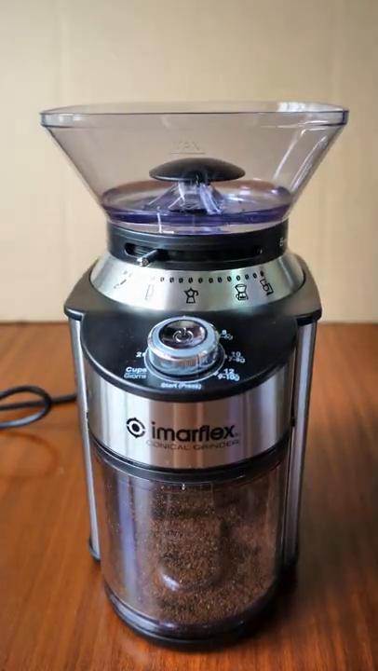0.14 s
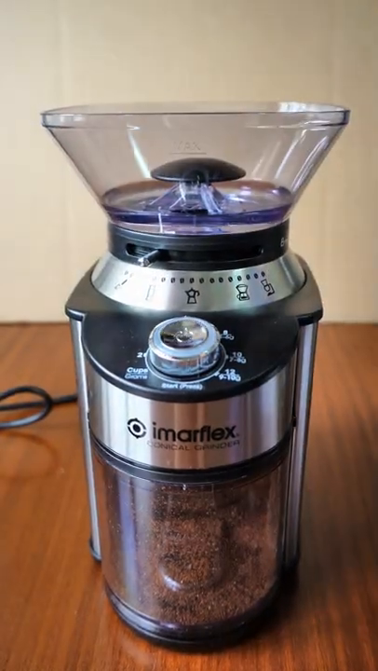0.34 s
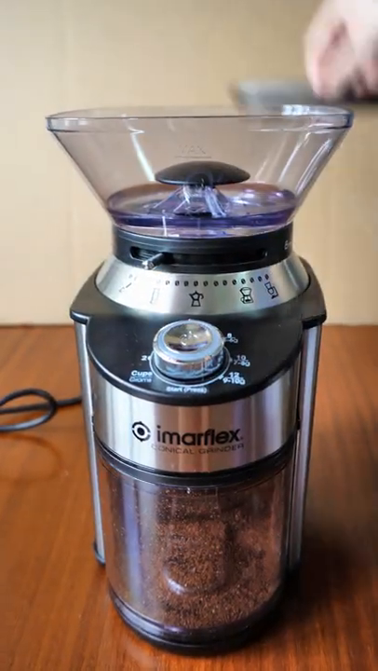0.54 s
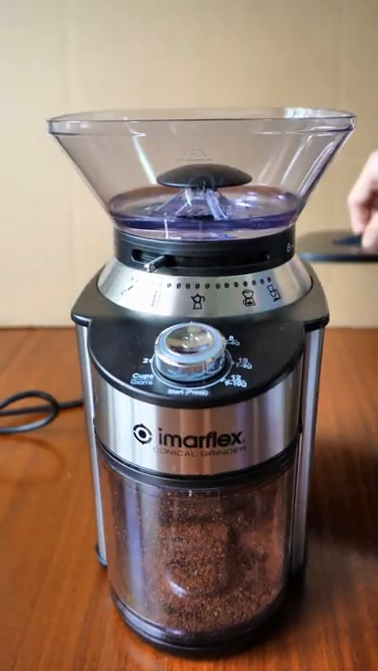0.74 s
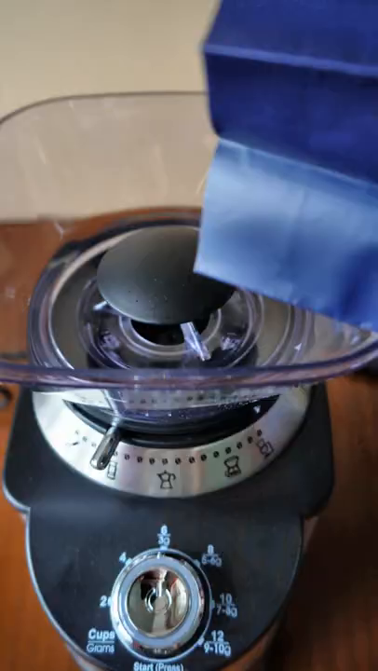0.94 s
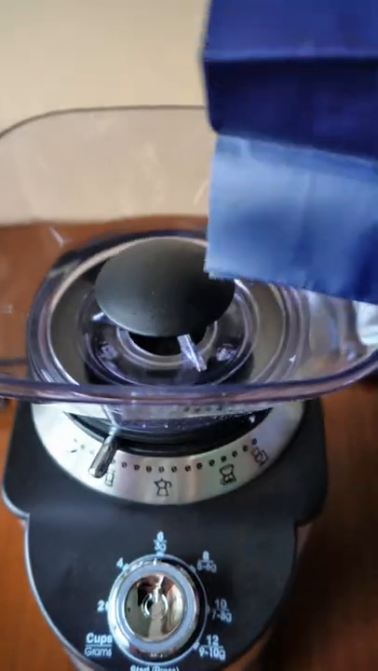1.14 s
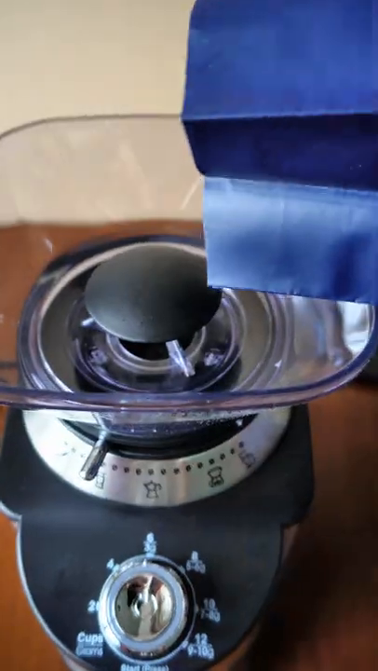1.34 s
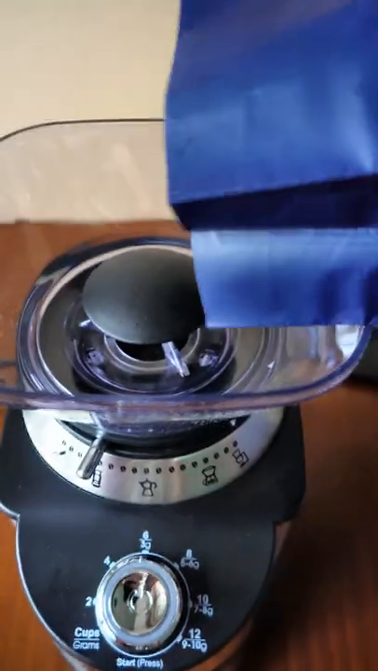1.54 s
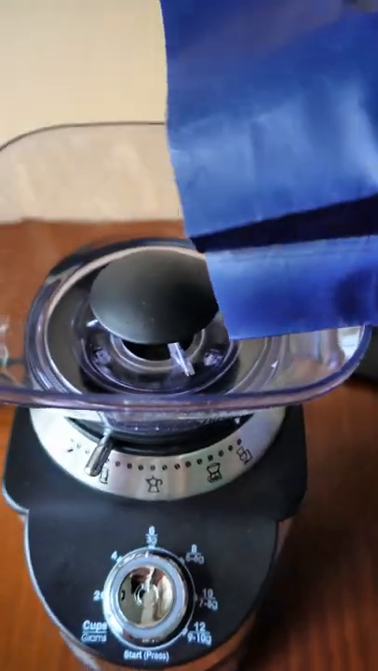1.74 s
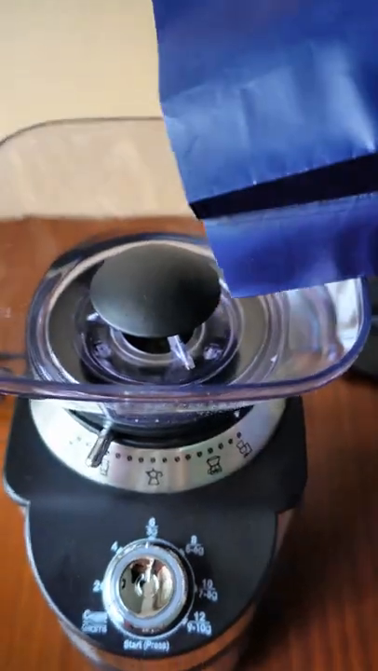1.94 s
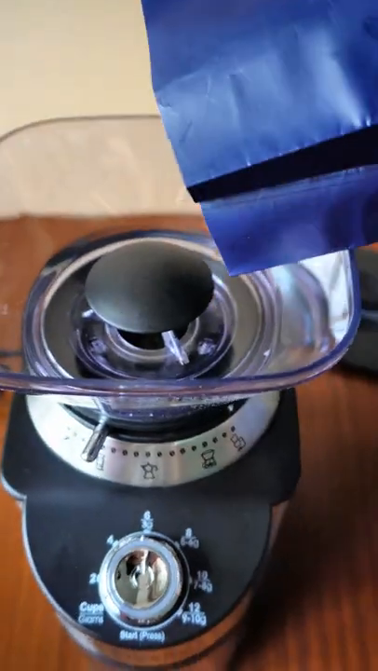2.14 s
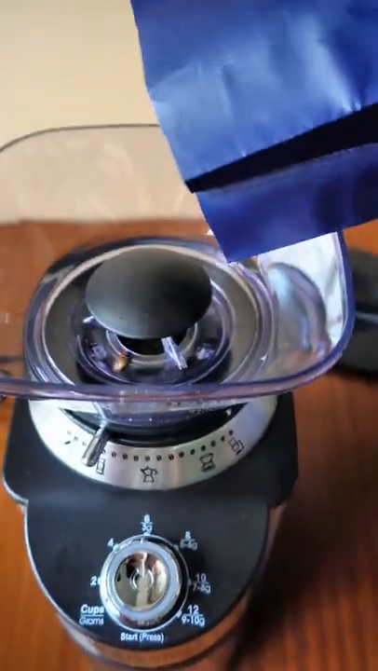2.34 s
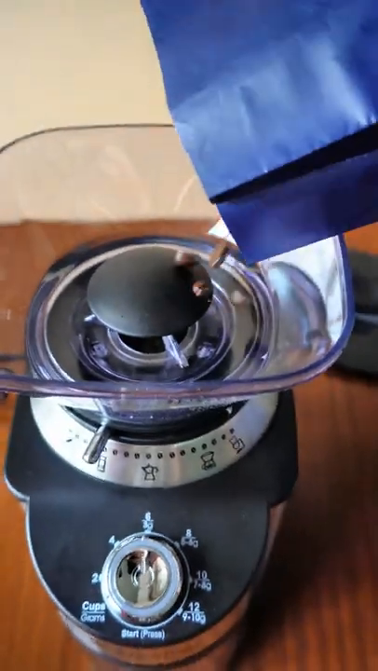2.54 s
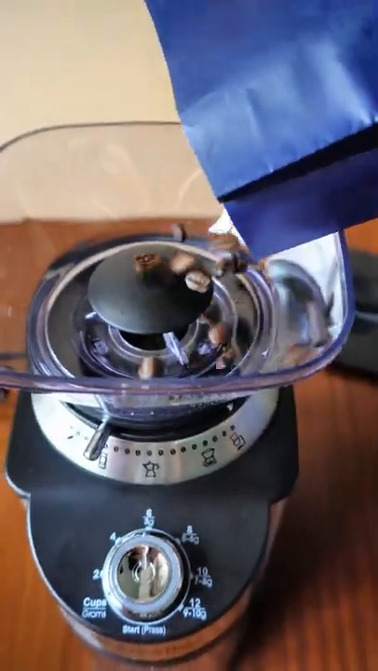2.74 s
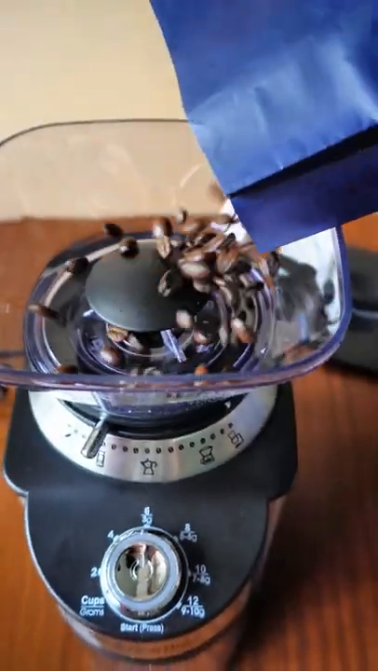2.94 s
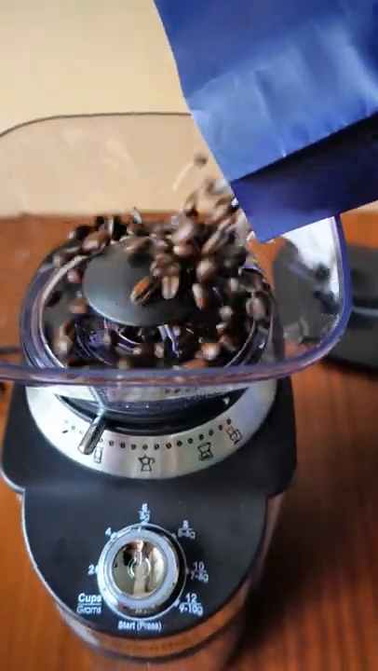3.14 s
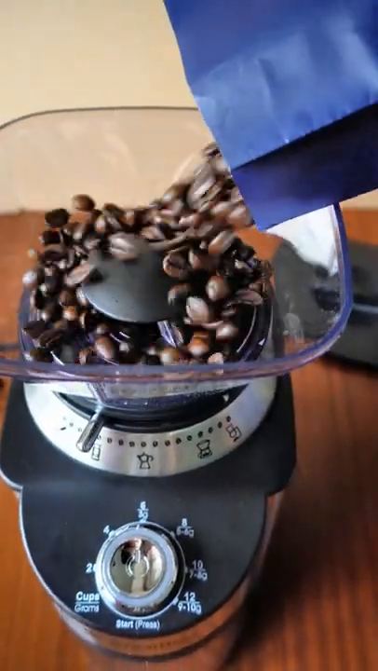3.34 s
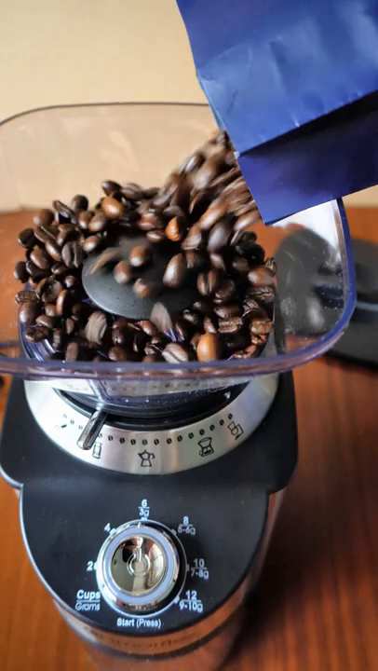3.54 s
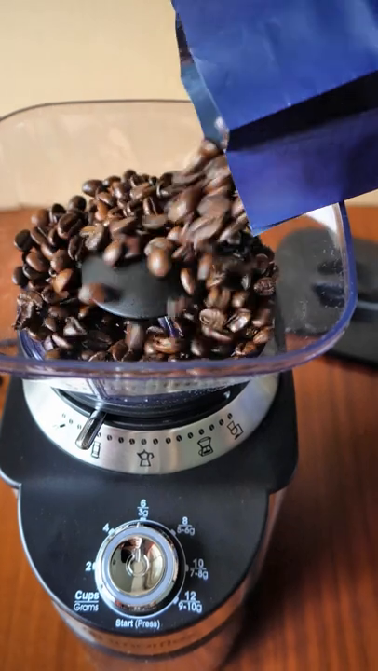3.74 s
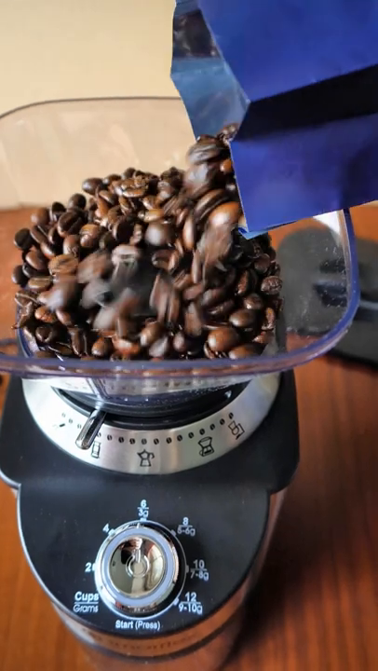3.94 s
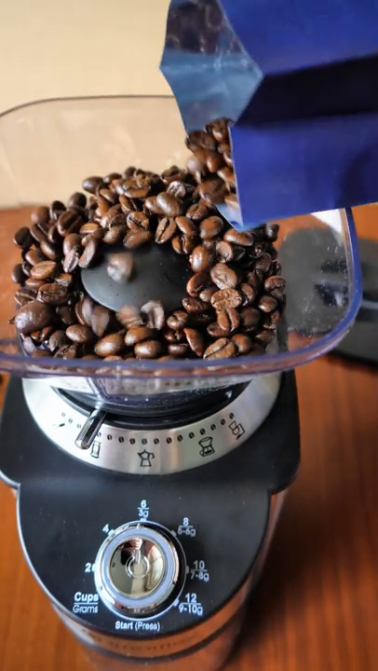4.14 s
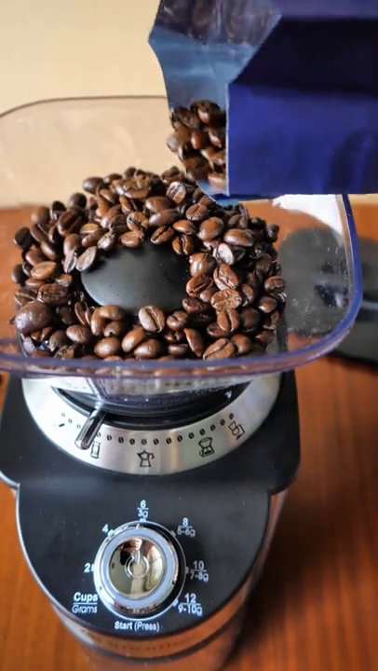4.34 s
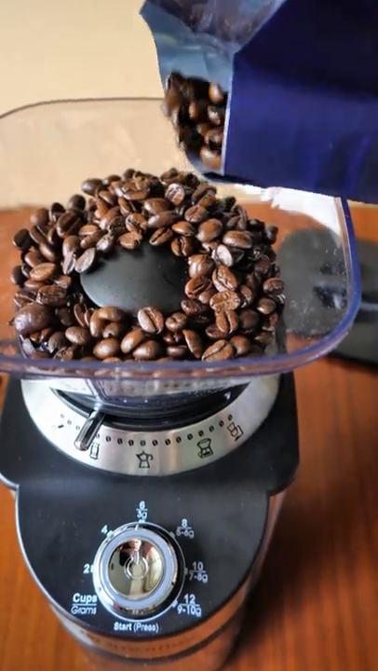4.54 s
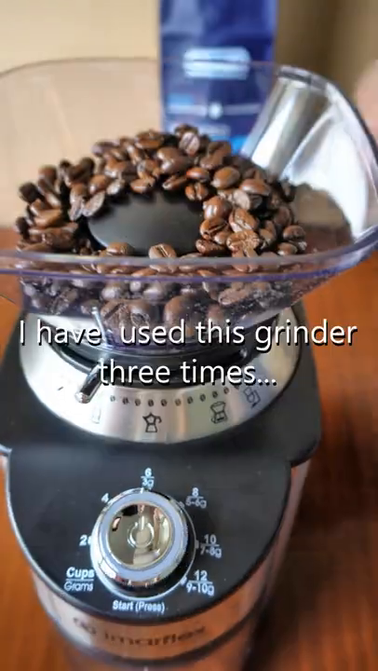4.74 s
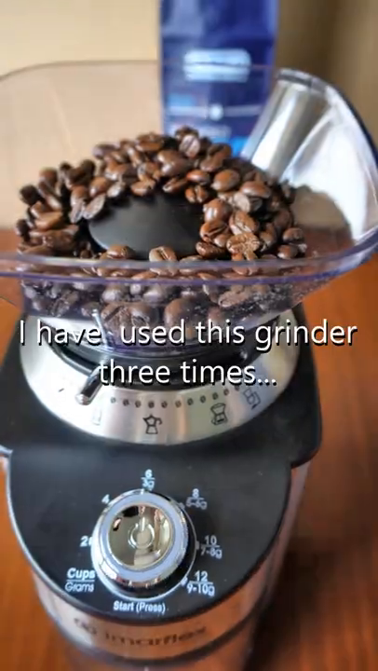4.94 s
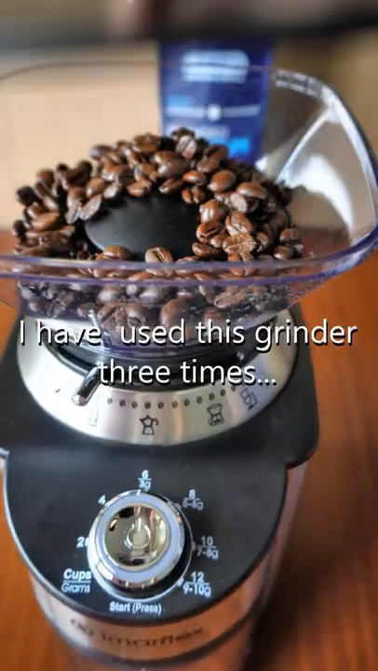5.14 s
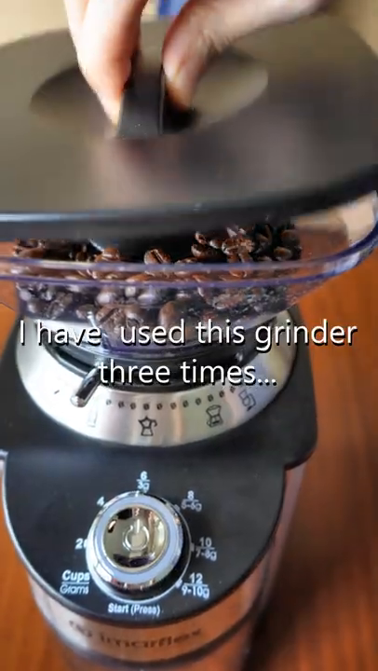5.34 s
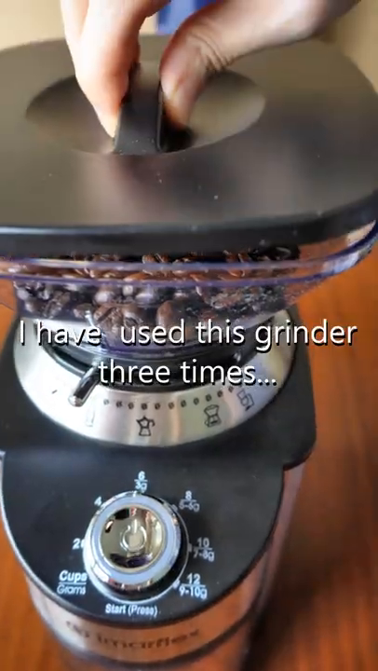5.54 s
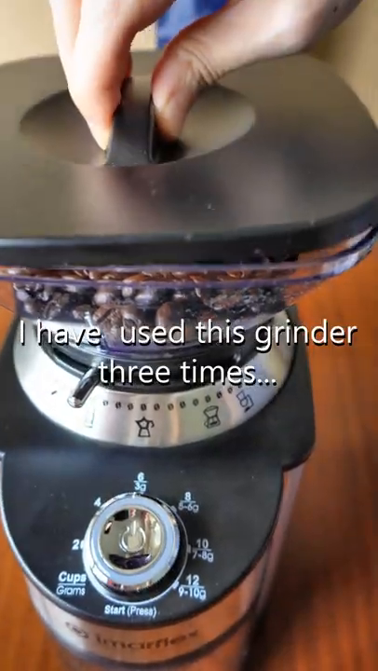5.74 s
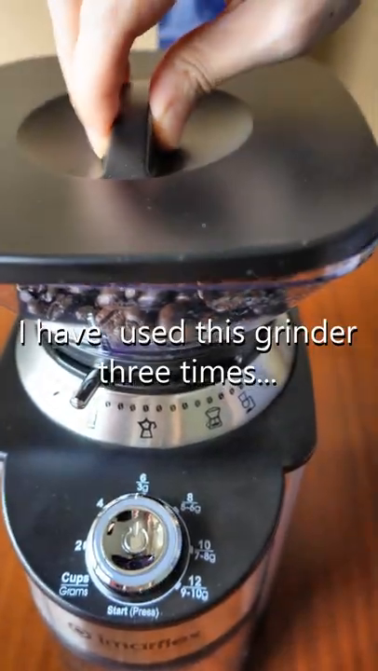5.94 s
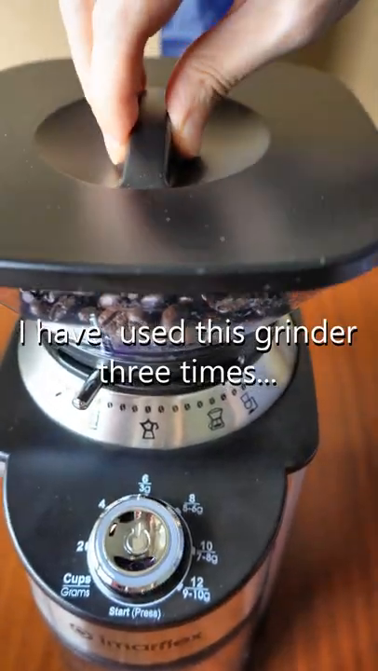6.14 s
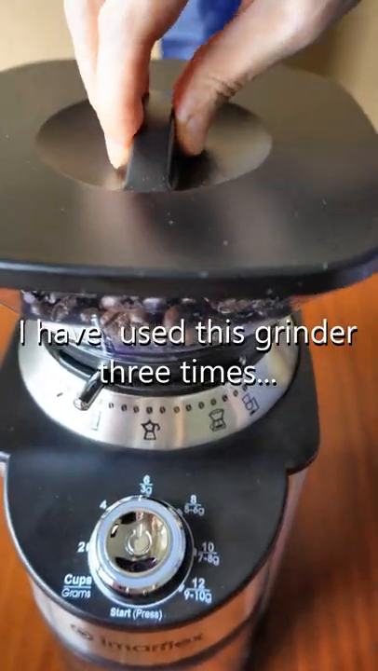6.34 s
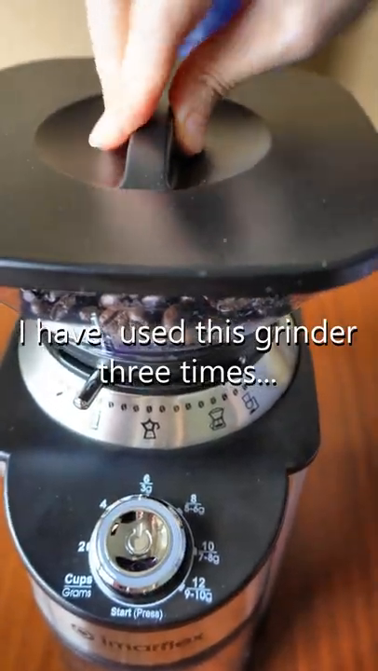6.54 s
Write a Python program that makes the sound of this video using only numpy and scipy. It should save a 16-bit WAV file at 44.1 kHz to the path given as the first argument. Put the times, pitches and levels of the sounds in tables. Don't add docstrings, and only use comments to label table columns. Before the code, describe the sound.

Two close microphones, nearly centred and slightly wider in the treble, catch soft skin rubs and plastic ticks, then sharp foil snaps with beans shifting inside. Hard bean clicks multiply into a loud hopper rattle, dwindling to stragglers and a few foil snaps. After an abrupt cut come hollow lid knocks and short plastic rubs over faint hiss and low hum.

```python
import sys
import numpy as np
from scipy import signal
from scipy.fft import rfft, irfft, next_fast_len
from scipy.io import wavfile
from scipy.ndimage import uniform_filter1d, minimum_filter1d, map_coordinates

SR = 44100
rng = np.random.default_rng(int(sys.argv[2]) if len(sys.argv) > 2 else 0)


def generate_wav(sig):
    pcm = np.round(np.clip(np.atleast_2d(sig).T, -1, 1) * 32767).astype(np.int16)
    wavfile.write(sys.argv[1], SR, pcm)


def boost_factor(decibels):
    exponent = np.asarray(decibels, float) / 20
    return 10 ** exponent


N = 294588
TIME = np.arange(N) / SR


def unit(x):
    return x / np.sqrt(np.mean(x ** 2) + 1e-20)


def along(points, hz):
    f, v = np.transpose(points)
    return np.interp(np.log(hz + 1), np.log(f + 1), v)


def curves(*tables):
    out = np.full((len(tables[0][0]) - 1, N), -120.)
    for rows in tables:
        s, *cols = np.transpose(rows)
        inside = (TIME >= s[0]) & (TIME <= s[-1])
        out[:, inside] = [np.interp(TIME[inside], s, c) for c in cols]
    return out


def filtered(x, response):
    m = next_fast_len(x.shape[-1] + 4096)
    spectrum = rfft(x, m) * response(np.fft.rfftfreq(m, 1 / SR))
    return irfft(spectrum, m)[..., :x.shape[-1]]


def body(modes, scatter_db):
    c, w, db = np.reshape(modes, (-1, 3, 1)).transpose(1, 0, 2)
    gain = boost_factor(db + scatter_db * rng.standard_normal(c.shape)) * rng.choice([-1, 1], c.shape)
    c = c + 0.12 * w * rng.standard_normal(c.shape)
    return lambda f: 1 + np.sum(gain * 1j * f * w / (c * c - f * f + 1j * f * w), axis=0)


def burst(t60, crack_db, size):
    t = np.arange(size) / SR
    decay = boost_factor(-60 * t / t60) + boost_factor(crack_db - 60 * t / 0.0059)
    z = rfft(rng.standard_normal((2, size)) * decay)
    even = z / np.sqrt(uniform_filter1d(np.abs(z) ** 2, size=size // 70) + 1e-9)
    return irfft(even) * (t < .75 * t[-1])


def drift():
    drift_db, drifts_per_s = 4, 5
    knots = rng.standard_normal(int(N * drifts_per_s / SR) + 4)
    return boost_factor(drift_db * map_coordinates(knots, [TIME * drifts_per_s]))


def grains(rate, spread_db, t60, spectrum, modes=[], count=3, own=list):
    out = 0
    for _ in range(count):
        draw = rng.random((2, N))
        size_db = np.minimum(-spread_db * np.log(draw[1] + 1e-9), 4 * spread_db)
        sizes = (draw[0] < rate / SR / count) * boost_factor(size_db)
        angles = np.array([np.ones(N), rng.standard_normal(N)])
        pair = drift() * sizes * angles
        tap = filtered(burst(t60, crack_db=0.0, size=4200)[:1], body(modes + own(), scatter_db=2.0))
        out = out + signal.oaconvolve(pair, tap, axes=1)[:, :N]
    out = filtered(out, lambda hz: boost_factor(along(spectrum, hz)))
    power = uniform_filter1d(out[0] ** 2, SR // 3)
    return out / np.sqrt(np.abs(power) + 1e-12)


def contacts(events, t60, modes, ring_db, scatter_db, low_hz, top_hz, crack_db, favour_db, broad_db):
    favour_octaves = 0.23
    out = np.zeros((2, N + SR))
    edges = [(low_hz, 1200), (1200, 3500), (3500, 7000), (7000, top_hz)]
    bands = [signal.butter(2, e, "bandpass", fs=SR, output="sos") for e in edges]
    for s, db, thud_db, edge_db, sparkle_db, hz in events:
        blow = burst(np.clip(t60, .003, .06), crack_db, size=6000)
        struck = []
        for c, w, g in modes:
            nearness = np.exp(-(np.log2(c / hz) / favour_octaves) ** 2)
            struck.append((c, w, g + ring_db + favour_db * nearness))
        ring = filtered(blow, body(struck + [(hz, 0.34 * hz, broad_db)], scatter_db))
        for sos, level_db, sign in zip(bands, (thud_db, 0, edge_db, sparkle_db), (1, -1, 1, -1)):
            part = sign * signal.sosfilt(sos, ring)
            peak = np.sqrt(uniform_filter1d(part[0] ** 2, size=150).max())
            out[:, round(s * SR):][:, :part.shape[1]] += boost_factor(db + level_db - 7.5) * part / peak
    return out[:, :N]


def touched(events, sparkle_db, per_hardness):
    return [(s, db, thud, edge, sparkle_db + per_hardness * edge, hz) for s, db, thud, edge, hz in events]


def strokes(rows):
    lines = [[(s, db), (s + length, db + swell_db)] for s, length, db, swell_db in rows]
    return uniform_filter1d(boost_factor(curves(*lines)[0]), size=260)


# frequency in Hz, level in dB per Hz.
AIR_COLOUR = [(15, -72.5), (25, -43.5), (53, -35.5), (73, -20), (106, -13), (167, -15.5), (207, -10),
              (383, -17), (1120, -9.5), (2850, -12), (3350, -16.5), (3630, -16.5), (15000, -33.5)]
# time in seconds, level in dB.
HUM_SWELLS = [
    (0, -68),
    (.724, -65.5),
    (4.652, -75),
    (5.75, -70.5),
    (6.55, -60),
]


def air():
    hiss = unit(filtered(rng.standard_normal((2, N)), lambda hz: boost_factor(along(AIR_COLOUR, hz))))
    low = unit(filtered(rng.standard_normal((2, N)), lambda f: 40 * f / np.abs(235 ** 2 - f * f + 40j * f)))
    swell_db_per_s = 21
    hum_db = np.max([db - swell_db_per_s * np.abs(TIME - s) for s, db in HUM_SWELLS], axis=0)
    return boost_factor(-61.5) * hiss + boost_factor(hum_db + 2.0) * low


# start in seconds, length in seconds, level in dB, swell in dB.
HAND_STROKES = [
    (0, 0.58, -64, 9.1),
    (.45, .55, -60.5, 3.2),
]
# frequency in Hz, level in dB per Hz.
SKIN_COLOUR = [(180, -47), (300, -9), (438, -10), (1180, -7), (1500, -4), (1620, -3.5), (4180, -14.5),
               (13000, -26)]
# time in seconds, peak in dB, thud over knock in dB (weight),
# edge over knock in dB (hardness).
LIFT_TICKS = [(0.2576, -37, -24, -7), (0.2952, -49, -9, -2), (0.328, -45, -14, -6),
              (0.4315, -27.5, -23, -6.5), (0.4742, -44.5, -5, 8), (0.635, -49, -13, -1), (0.699, -54, 1, 4),
              (0.7365, -23.5, -2, -10.5), (0.7487, -43, -2, -4), (0.795, -33.5, -21, -11),
              (0.834, -36.5, -11, -8), (0.87, -40, -22, -13), (0.891, -33, -25, -13), (0.956, -51, -8, 7)]
# frequency in Hz, width in Hz, level in dB.
FOIL_MODES = [(895, 230, 1.9), (1200, 5000, 0.62), (2620, 130, 2.5), (4200, 760, 5.4), (5580, 1153, 1.5)]
# as the ticks, then pitch in Hz.
RIM_KNOCKS = [(5.3975, -14.5, -8, -4.5, 910), (5.4015, -24, -8, 6.5, 4040), (5.4322, -17, -7, -6.5, 2700),
              (5.4500, -25, -4, -4.5, 2700), (5.7215, -27, -7.5, 3.5, 893), (5.7255, -20.5, -3, -2, 5760),
              (5.7785, -14, -14, -11.5, 1610), (5.7952, -29, -16, -23, 1500),
              (5.8888, -39.5, 8.5, -0.5, 890), (5.9974, -44.5, 6.5, -24, 923), (6.0826, -28, 0, -2.5, 910),
              (6.0882, -27, 1, -5.5, 900), (6.095, -28.5, -3, 2, 890), (6.103, -18, 0, -11.5, 970),
              (6.2475, -34.5, 11.5, -4, 820), (6.2535, -17, -10, -16.5, 1680),
              (6.3215, -43, -14, -16, 1600), (6.6443, -43, 0, 2, 1720)]
# frequency in Hz, width in Hz, level in dB.
LID_MODES = [(305, 32, 38), (885, 93, 13.8), (1450, 92, 9), (1610, 74, 13.7), (2410, 170, 12.3),
             (2780, 100, 9.7), (3110, 280, 6.9), (4020, 220, 9.5), (4820, 170, 8.5), (5850, 330, 8.9),
             (6970, 100, 2.5)]
# start in seconds, length in seconds, level in dB, swell in dB.
RIM_RUBS = [
    (5.8, 0.084, -49, 5),
    (5.9, 0.094, -59.5, 0),
    (5.995, 0.079, -55, 7),
    (6.066, 0.049, -47, 17.5),
    (6.27, 0.095, -50.5, 4),
    (6.36, 0.21, -54, -10.5),
    (6.55, 0.11, -62, 8.5),
]
# frequency in Hz, level in dB per Hz.
RUB_COLOUR = [(88, -55), (150, -16), (289, -11), (620, -6), (900, -6), (1200, -20.5), (1510, -8),
              (4120, -22.5), (15000, -35.5)]


def lid():
    hand = boost_factor(-2.0) * strokes(HAND_STROKES) * grains(2300, 3.2, 0.0155, SKIN_COLOUR)
    rub = boost_factor(0.2) * strokes(RIM_RUBS) * grains(1700, 1.3, 0.047, RUB_COLOUR)
    lifted = touched([(*row, 2700) for row in LIFT_TICKS], sparkle_db=-9, per_hardness=0.74)
    ticks = contacts(lifted, 0.015, FOIL_MODES, ring_db=-5.0, scatter_db=5.0, low_hz=330, top_hz=12900,
                     crack_db=-9.0, favour_db=-1.0, broad_db=7.5)
    seated = touched(RIM_KNOCKS, sparkle_db=-18, per_hardness=0.35)
    knocks = contacts(seated, 0.03, LID_MODES, ring_db=1, scatter_db=2.0, low_hz=710, top_hz=13800,
                      crack_db=-10.5, favour_db=5.0, broad_db=-12)
    return hand + rub + ticks + knocks


CUTS = [
    0,
    1.0075,
    4.647,
    6.68,
]
# time in seconds, level in dB.
TIPPING = [(1.008, -35), (1.056, -37.5), (1.188, -41.5), (1.54, -37.5), (1.86, -29), (2.066, -34),
           (2.302, -42), (2.4, -34.5), (2.6, -35)]
# time in seconds, level in dB.
SETTLING = [(4.2, -48), (4.26, -45), (4.314, -47), (4.454, -51), (4.608, -44), (4.642, -42)]
# time in seconds, peak in dB, thud over knock in dB,
# edge over knock in dB, pitch in Hz.
TIPPING_SNAPS = [(1.0071, -29.5, -12, 4, 1500), (1.05, -17, -28, -17, 3080), (1.106, -26, -10, -1, 3960),
                 (1.1311, -11.5, -16, -8, 2320), (1.1484, -5.5, -18, -13, 2450),
                 (1.2063, -13.5, -17, -11.5, 2390), (1.244, -16, -17, -11, 4000),
                 (1.2506, -27.5, 3.5, -12, 1500), (1.279, -7, -8, -11, 2430), (1.3164, -46, -16, -6, 2130),
                 (1.378, -35.5, -23, -8, 1450), (1.4314, -23, -12, -8, 1440), (1.477, -24.5, -15, -2, 2300),
                 (1.5004, -22, -2.5, -6, 3960), (1.5064, -23, -10, -7, 1650), (1.5234, -31, -3, -12, 1410),
                 (1.6051, -10, -20, -7, 1440), (1.6768, -23.5, -3, -5, 1370), (1.7216, -10.5, -1, 5, 1140),
                 (1.7574, -29, 0, -21, 1880), (1.7836, -25, -1, -13, 1370), (1.8118, -20, -8, -24, 1980),
                 (1.9994, -27, 1, -7, 1020), (2.0652, -30, -6, 7, 6140), (2.0813, -26, -6, -14, 1150),
                 (2.1274, -49, -16, -4, 2070), (2.1724, -42, -9, 3, 1110)]
RIGHTING_SNAPS = [(4.2513, -19, -15, -32, 1780), (4.3171, -26.5, -6, 1, 1610), (4.414, -41, -22, -11, 2610),
                  (4.4522, -41.5, -22, 6, 5520), (4.5968, -19, -9.5, -10, 3230),
                  (4.637, -30.5, -18, -9, 3250)]
# frequency in Hz, level in dB per Hz.
RUSTLE_COLOUR = [(35, -75.5), (60, -51), (301, -13), (1070, -1.5), (1650, -2), (2010, -1), (2240, -5.5),
                 (2780, -3.5), (11000, -21), (14300, -51.5), (22000, -120)]
# frequency in Hz, level in dB per Hz.
CRACKLE_COLOUR = [(3240, -25), (5500, -4.5), (9360, -8), (10500, -8), (14700, -11), (16000, -10.5)]


def bag():
    shift_db, = curves(TIPPING, SETTLING)
    rustle = boost_factor(shift_db - 2.0) * grains(900, 2.1, 0.016, RUSTLE_COLOUR, count=10)
    tumble = boost_factor(shift_db - 6.0) * grains(150, 4.5, 0.012, RUSTLE_COLOUR, FOIL_MODES, count=5)
    grip_db, attack_s, let_go_s, let_go_db_per_s = -39.5, 0.015, 4.02, -37
    attack = np.clip((TIME - CUTS[1]) / attack_s, 0, 1)
    grip = attack * boost_factor(grip_db + let_go_db_per_s * np.maximum(TIME - let_go_s, 0))
    creasing = boost_factor(0.25 * (shift_db - grip_db) - 2.5)
    crackle = grip * creasing * grains(1900, 4.4, 0.013, CRACKLE_COLOUR)
    creases = touched(TIPPING_SNAPS + RIGHTING_SNAPS, sparkle_db=-15.5, per_hardness=1)
    snaps = contacts(creases, 0.022, FOIL_MODES, ring_db=-3, scatter_db=8.0, low_hz=446, top_hz=15600,
                     crack_db=1.0, favour_db=0.5, broad_db=7.0)
    return rustle + tumble + crackle + snaps


# time in seconds, peak in dB, edge
# over knock in dB (hardness), sparkle over knock in dB (smallness), pitch in Hz.
SINGLE_BEANS = [(2.2565, -8.5, 1, -6, 2620), (2.2822, -14, -50, -24, 2620), (2.3436, -21.5, 14.5, 0.5, 4840),
                (2.3458, -15.5, 9.5, 17, 7520), (2.3662, -22, -1, 4, 2610), (2.4182, -22.5, 16, 9, 7550),
                (2.4563, -24, 23.5, 8.5, 6100), (2.4667, -34.5, 14, -12, 5450), (2.485, -22.5, 8, 6, 5620),
                (2.5216, -8.5, -4.5, -1, 2620), (2.5435, -12, 4.5, -14, 4000), (2.5682, -14, -10.5, 8.5, 5760),
                (2.5899, -10.5, -12.5, -13, 3590), (2.6044, -16.5, -6, -5, 3590), (2.6099, -14.5, 0.5, -7.5, 6350),
                (2.6157, -12.5, 9, 6.5, 7480), (2.6288, -15.5, -6.5, -7, 3440), (2.6607, -9, -1.5, -6, 5470),
                (2.6831, -13.5, -5, -7, 5470), (2.6913, -12.5, 5, 6.5, 5420), (2.7067, -20, -5, 1, 4790),
                (2.7091, -8.5, 1, 2, 7540), (2.7467, -8, 6.5, 2, 5480), (2.7554, -14, 1, 9, 5380),
                (2.7696, -15, 5.5, -1.5, 5740), (2.7918, -13.5, 4, 0.5, 5060), (2.8034, -11.5, 2, -0.5, 5150),
                (2.8253, -20, -4.5, 11.5, 5100), (2.8751, -17.5, -3.5, -11.5, 5730), (2.8834, -12, -2, -6, 5750),
                (2.9024, -12.5, 2, -8, 5080), (2.9725, -28.5, 1, -1, 5060),
                (3.8905, -5, -18, -5.5, 5180), (3.9541, -6, -5, -6, 2540), (3.9924, -17, 1, 5.5, 7410),
              (4.0048, -13, -2, -25, 5620), (4.0292, -15, 2, -2, 5880), (4.0404, -12.5, -13, -6.5, 3000),
              (4.0607, -15, -1, -1, 5180), (4.0766, -16.5, 10, 2, 5900), (4.1132, -16, 0.5, -6, 3060),
              (4.1314, -18, 10, 2, 6290), (4.145, -22.5, 8, -13, 6030), (4.153, -20, 1, -4, 5130),
              (4.1616, -18.5, 5.5, -1, 5900), (4.1737, -18, -4, -1.5, 2630), (4.197, -22, -10, -4, 2700),
              (4.2193, -20, -4, -20, 2620), (4.2604, -41, -15, -13, 2710), (4.2816, -35.5, 2.5, 0, 5890),
              (4.289, -34, 7, -0.5, 5980),
                (2.3475, -16.5, -14, -19, 2605),
    (3.993, -20.5, 5, 8.5, 5260),
    (4.283, -45, 4, 15, 7900),
]
# time in seconds, flow in dB.
POUR = [
    (2.56, -33),
    (2.745, -23),
    (2.869, -18),
    (3.041, -17),
    (3.317, -16),
    (3.571, -15.5),
    (3.97, -20),
    (4.06, -23.5),
    (4.24, -48.5),
]
# frequency in Hz, width in Hz, level in dB.
HOPPER_MODES = [(880, 65, -4.5), (1960, 120, 6), (2605, 32.5, 16), (2966, 98, 9), (3424, 150, 4),
                (4080, 77, 4.5), (4500, 150, -7), (5150, 130, 8), (5756, 97, 9), (6195, 280, 5.5),
                (7420, 70, 6.5), (9660, 220, 3), (11500, 1700, 13)]
# frequency in Hz, level in dB per Hz.
WALL_COLOUR = [(30, -58), (100, -46.5), (888, -16), (1220, -14.5), (1960, -8), (2280, -10.5), (2550, -10),
               (4740, -3.5), (6300, -5), (9000, -14.5), (11700, -21), (19800, -120)]
# frequency in Hz, level in dB per Hz.
CLICK_COLOUR = [(4120, -45), (7000, -6.5), (7320, -4), (8640, -12), (14700, -8), (16000, -11.5)]


def bean():
    return [(5560 * np.exp(0.25 * rng.standard_normal()), 700, 6)]


def beans():
    flow_db, = curves(POUR)
    thin_db = flow_db - flow_db.max()
    impacts_per_s, denser = 2600, 0.49
    rate = np.clip(impacts_per_s * boost_factor(denser * thin_db), 150, 9000)
    heap = [(c, 1.2 * w, db - 3) for c, w, db in HOPPER_MODES]
    wall = boost_factor(flow_db + 2.5) * grains(rate, 3.1, 0.0035, WALL_COLOUR, heap, count=20, own=bean)
    fill_db_per_s = -5.5
    click_db = flow_db - 2 + thin_db + fill_db_per_s * (TIME - POUR[0][0])
    click = boost_factor(click_db + 4.0) * grains(1.3 * rate, 3.6, 0.0092, CLICK_COLOUR, count=6)
    thud_db, soft_thud = -35, .4
    single = []
    for s, db, edge, sparkle, hz in SINGLE_BEANS:
        single.append((s, db, thud_db - soft_thud * edge, edge, sparkle, hz))
    drops = contacts(single, 0.019, HOPPER_MODES, ring_db=-4, scatter_db=5.0, low_hz=490, top_hz=16200,
                     crack_db=-1.0, favour_db=3, broad_db=8.5)
    return wall + click + drops


# frequency in Hz, time to fall 60 dB in seconds.
ROOM_DECAY = [(200, 0.57), (1500, 0.44), (5000, 0.35), (9000, 0.1), (14000, 0.081)]
WET_DB = [-11.5, -10.5, -11]


def room(x):
    out, step = np.zeros((2, N)), SR // 4
    for start, end, wet_db in zip(CUTS, CUTS[1:], WET_DB):
        start, end = round(start * SR), min(round(end * SR), N)
        for k in range(start, end, step):
            hz, t, z = signal.stft(rng.standard_normal((2, SR // 2)), SR, nperseg=256)
            decay = boost_factor(-60 * t / along(ROOM_DECAY, hz)[:, None])
            tail = signal.istft(z * decay, SR, nperseg=256)[1]
            tail = np.pad(tail / np.linalg.norm(tail[0]), ((0, 0), (round(.004 * SR), 0)))
            wet = signal.fftconvolve(x[None, k:min(k + step, end)], tail, axes=1)[:, :end - k]
            out[:, k:k + wet.shape[1]] += boost_factor(wet_db) * wet
    return out


# frequency in Hz, side minus mid in dB.
PORT_SPREAD = [(60, -27), (99, -30.5), (160, -24.5), (270, -25.5), (450, -25), (740, -15.5), (1220, -18),
               (2010, -22), (3330, -13), (5500, -13), (9080, -4), (15000, -4)]
PAN_DB = [-2, -2.85, -1]
# frequency in Hz, left minus right in dB.
PORT_TILT = [(60, 0), (240, 3), (950, 3.5), (3770, 3.5), (15000, 1)]


def scene():
    cover, foil, stream = lid(), bag() * (TIME < CUTS[2]), beans()
    near = stream + foil + cover
    mid, side = near + room(near[0]) + air()
    side = filtered(side, lambda hz: boost_factor(along(PORT_SPREAD, hz) - 1.3))
    pan = np.array(PAN_DB)[np.searchsorted(CUTS[1:-1], TIME)] / 2
    pair = np.array([mid + side, mid - side]) * boost_factor([pan, -pan])
    return filtered(pair, lambda hz: boost_factor([along(PORT_TILT, hz) / 2, -along(PORT_TILT, hz) / 2]))


def roll_off(x):
    return signal.sosfilt(signal.butter(12, 16980, fs=SR, output="sos"), x)


# start in seconds, length in seconds, above Hz.
HUSH = [
    (2.334, .008, 5500),
    (5.385, .010, 600),
    (5.706, .012, 2200),
    (6.238, .011, 3500),
]


def record(dry):
    top_hz, top_db = [15650, 15950, 16700, 17000], [0, -36.5, -42.5, -120]
    x = filtered(dry, lambda hz: boost_factor(np.interp(hz, top_hz, top_db)))
    for s, length, hz in HUSH:
        hush = uniform_filter1d(1. * (np.abs(TIME - s - length / 2) < length / 2), size=90)
        x = x - 0.9 * hush * filtered(x, lambda f: f > hz)
    need = np.minimum(1, 1 / (np.abs(x).max(axis=0) + 1e-9))
    gain = uniform_filter1d(minimum_filter1d(need, size=129), size=129)
    return roll_off(x * gain)


dry = scene()
out = record(dry)
generate_wav(out)
```